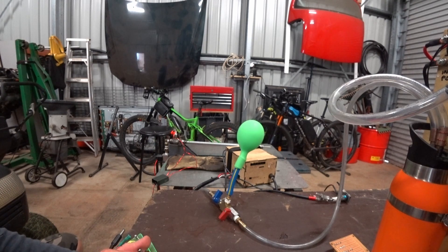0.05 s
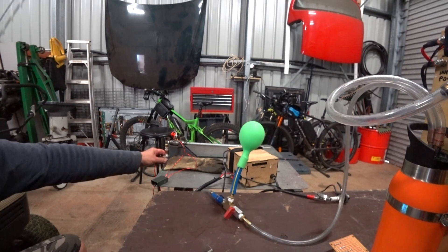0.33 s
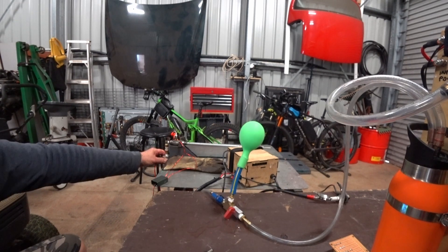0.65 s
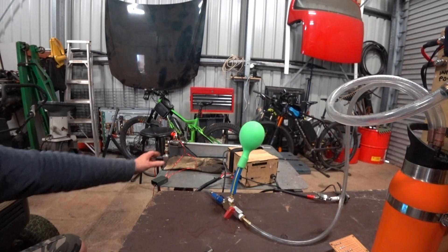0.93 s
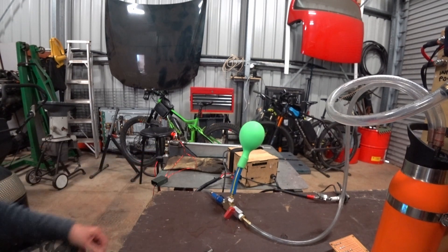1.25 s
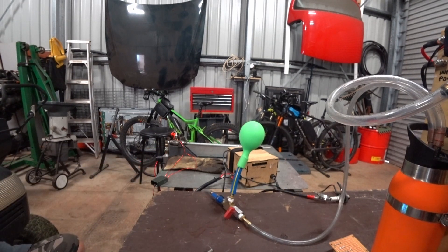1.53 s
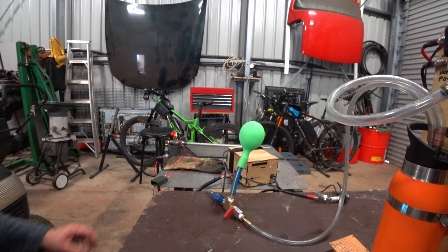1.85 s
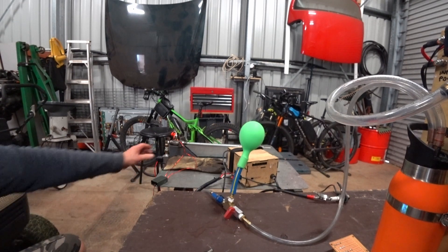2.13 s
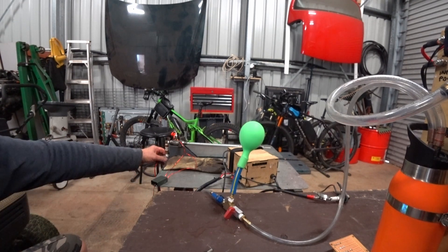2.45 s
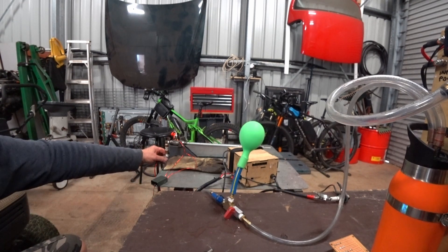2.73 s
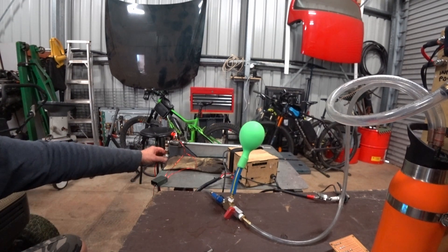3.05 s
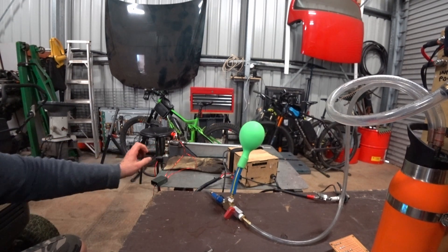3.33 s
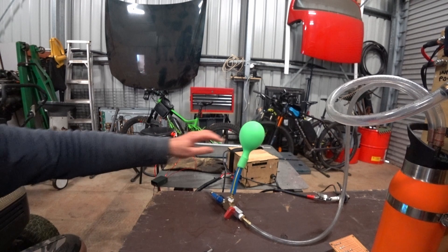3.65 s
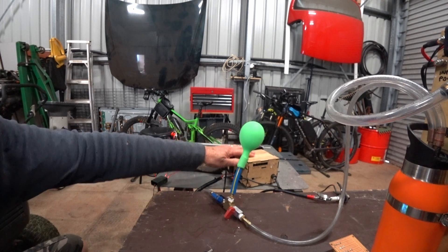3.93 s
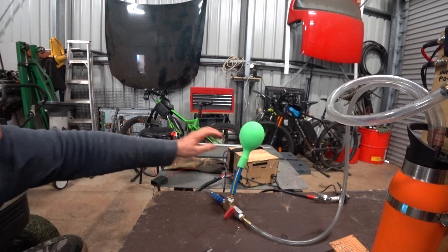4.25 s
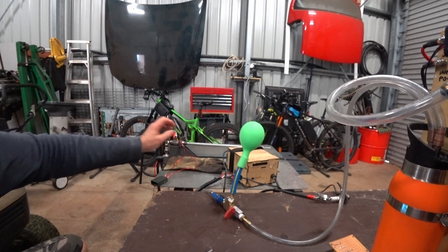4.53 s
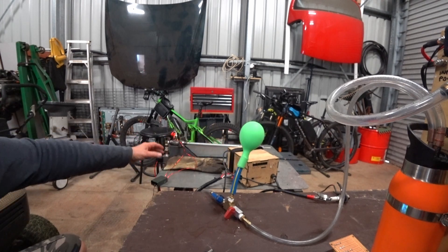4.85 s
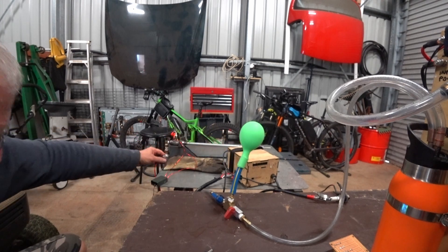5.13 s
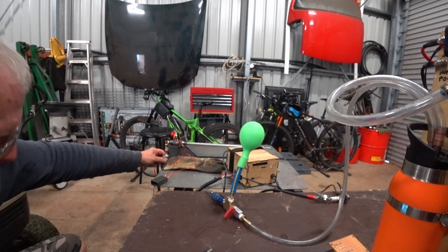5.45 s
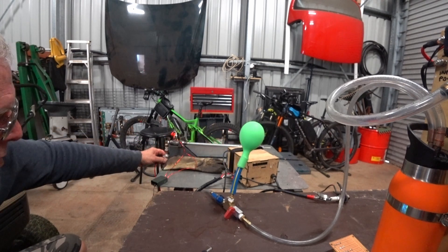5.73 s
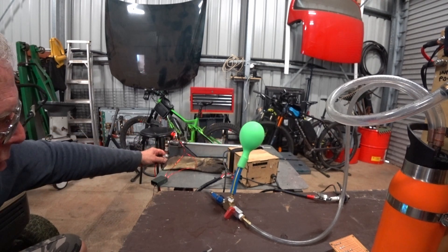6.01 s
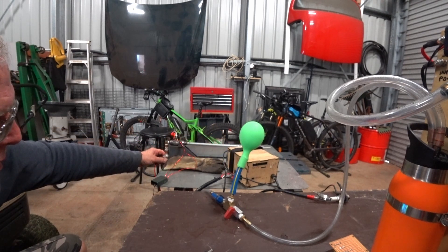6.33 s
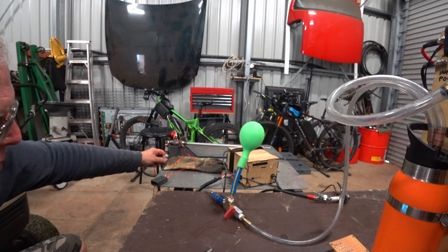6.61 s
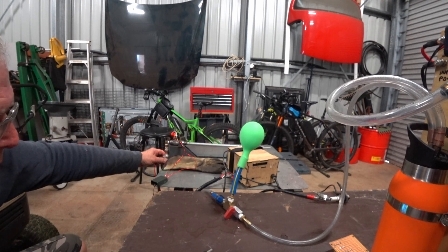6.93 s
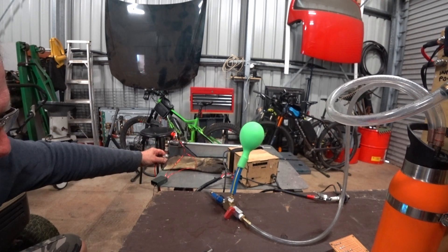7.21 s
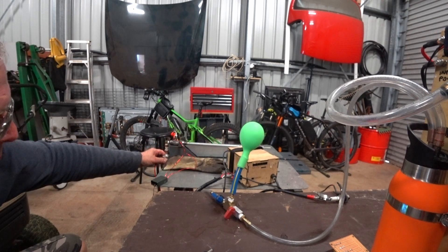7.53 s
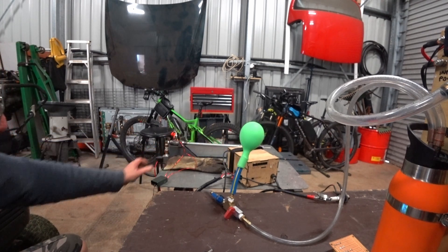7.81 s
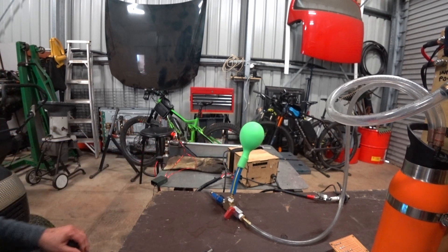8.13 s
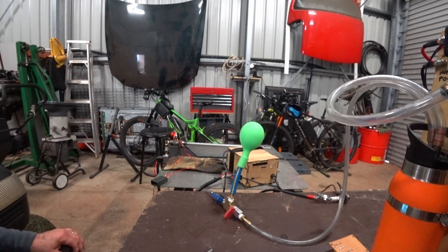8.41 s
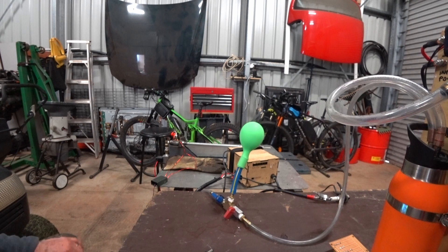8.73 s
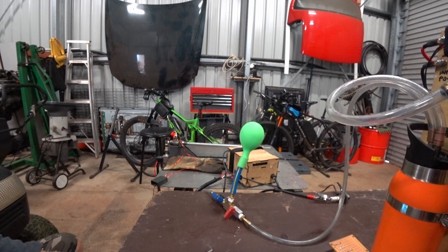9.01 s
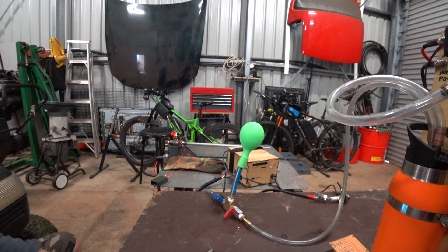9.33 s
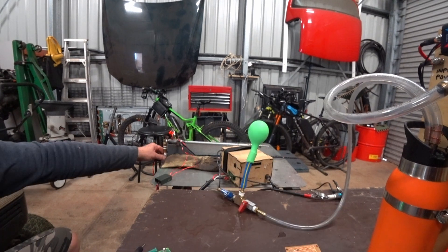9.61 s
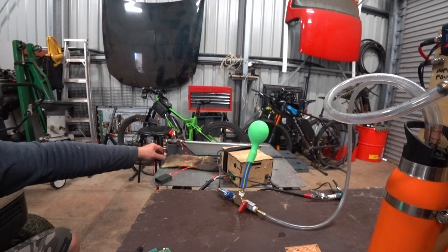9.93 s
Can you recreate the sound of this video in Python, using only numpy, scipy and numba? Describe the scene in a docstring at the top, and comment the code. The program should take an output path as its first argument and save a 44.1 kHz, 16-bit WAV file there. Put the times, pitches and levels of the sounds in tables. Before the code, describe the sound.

A thin, faint gas squeal rises, then a huge bang from a homemade engine tube fills a sheet-metal shed and leaves high tones ringing. A valve gives a short puff, and the rig makes a sharp clunk, metal clicks and dull knocks over a faint hiss. A second huge bang follows, then a knock, a sleeve rustle and a soft scuff. The microphone squashes both blasts, holding their echo level before it fades.

```python
"""Two huge gas detonations from a homemade engine tube in a sheet-metal shed.
Each shock fills the shed and leaves high tones lingering; the camera's limiter holds the reverberation
at one level until it dies down. Between shots a valve puffs and the rig clunks, clicks and knocks.
Gas hisses thinly in the line and squeals before the first shot. Behind it: a scuff, a rustling
sleeve, a faint low drone and still air with a thin whine."""
import sys
import numpy as np
from scipy import signal
from scipy.fft import rfft, irfft
from scipy.io import wavfile
from scipy.ndimage import uniform_filter1d
from numba import njit

SR = 44100
rng = np.random.default_rng(int(sys.argv[2]) if len(sys.argv) > 2 else 0)


def log_audio(samples):
    """Write samples as a 16-bit WAV file to the path given in sys.argv[1]."""
    # one column per channel
    frames = np.atleast_2d(samples).T
    # limit to full scale, then quantise
    limited = np.clip(frames, -1, 1)
    pcm = np.round(limited * 32767).astype(np.int16)
    wavfile.write(sys.argv[1], SR, pcm)


N = 439677
TIME = np.arange(N) / SR
TAIL = TIME[:2 * SR]  # time axis of one event


# shots: t/s, reverb level/dB, blast re reverb/dB, blast length/s, treble shelf/dB,
# ripple spacing/Hz, ripple depth/dB, punch/dB
DETONATIONS = [(1.2253, 45.5, -5, 0.0034, -0.5, 1453, 4, -14),
               (8.176, 46, -4.5, 0.0032, -3.5, 2336, 2, -8.5)]
FIRST_BANG_S = DETONATIONS[0][0]
# shock spectrum: f/Hz, level/dB
SHOCK_SPECTRUM = [(40, -47), (110, -43.5), (200, -29), (400, -22), (560, -18), (750, -12), (1100, -2.5),
                  (1400, -0.5), (1620, -5), (1860, -12), (2350, -1), (3050, -6), (3550, 0.5), (4350, -3.5),
                  (5000, -9), (7300, -7.5), (8300, -11.5), (12000, -13.5), (15000, -25.5)]

def detonations(room, shelf_hz=7500, ripple_from_hz=4800, punch_hz=450, bark_hz=2450, bark_db=4,
                ring_db=-19.5):
    """A shock leaves the tube and fills the shed; each shot has its own treble level."""
    out, ring = np.zeros((2, N)), room_ring()
    for t_s, db, blast_db, blast_s, treble_db, spacing_hz, ripple_db, punch_db in DETONATIONS:
        def shock_gain(hz):
            # a second front close behind the first combs the treble
            comb_db = ripple_db * np.cos(2 * np.pi * hz / spacing_hz) * above(hz, ripple_from_hz) ** 2
            return undb(across(SHOCK_SPECTRUM, hz) + treble_db * above(hz, shelf_hz) + comb_db)

        def mouth_gain(hz):
            punch = undb(punch_db) * hump(hz, punch_hz, punch_hz / 2) ** 2
            bark = undb(bark_db) * hump(hz, bark_hz, bark_hz / 10)
            return shock_gain(hz) + punch + bark
        burst = noise(len(TAIL), side_db=-14) / (1 + (TAIL / blast_s) ** 10)
        blast = unit(colour(burst, mouth_gain))
        reverb = unit(colour(room, shock_gain))
        add(out, t_s, db, undb(blast_db) * blast + reverb + undb(ring_db) * ring)
    return out


# room modes: f/Hz, level/dB
ROOM_MODES = [(2331, -37.5), (2466, -48), (2546, -42.5), (2799, -34.5), (3521, -47.5), (3607, -38),
              (3849, -42), (4301, -36), (4646, -53.5)]

def room_ring(t60_s=0.87):
    """High tones linger in the reverberation after each bang."""
    modes = 0
    for hz, db in ROOM_MODES:
        phase = rng.uniform(0, 2 * np.pi) + .5 * rng.standard_normal((2, 1))
        modes = modes + undb(db) * np.sin(2 * np.pi * hz * TAIL + phase)
    return unit(modes * fade(t60_s) * (1 - fade(.15)))


# hits of the clunk: t/s, level/dB, t60/s, room/dB
CLUNK_HITS = [(3.8933, -5, 0.055, -9), (3.8991, 12.5, 0.014, -4.5), (3.9096, 6, 0.054, -12.5)]
# clunk spectrum: f/Hz, level/dB
CLUNK_SPECTRUM = [(40, -57), (100, -24), (220, -15.5), (400, -1.5), (500, -1.5), (690, 4.5), (830, -7),
                  (1050, 0), (1450, -0.5), (1800, -3), (2600, -7), (3700, -7.5), (4800, -4.5),
                  (6500, -13.5), (7600, -11), (9000, -23), (11500, -19.5), (16000, -38)]

def rig_clunk(room, thump_hz=70, thump_width_hz=45, thump_db=-28):
    """A sharp clunk in three quick hits, with a low thump."""
    out = np.zeros((2, N))
    for t_s, db, t60_s, room_db in CLUNK_HITS:
        hit = crack(t60_s, side_db=-15) + undb(room_db) * room
        add(out, t_s, db, colour(hit, lambda hz: undb(across(CLUNK_SPECTRUM, hz))))
    thump = colour(crack(t60_s=.015), lambda hz: hump(hz, thump_hz, thump_width_hz))
    add(out, CLUNK_HITS[0][0], thump_db, thump)
    return out


# jet spectrum: f/Hz, level/dB
JET_SPECTRUM = [(150, -48), (400, -41.5), (570, -20), (760, -34), (1120, -23), (1850, -39), (2300, -24),
                (3080, -20.5), (3430, -51), (3900, -25), (4600, -19), (5400, -13), (9000, -12),
                (12400, -15), (14000, -12), (15500, -41)]
# nozzle cavities: f/Hz, half-width/Hz, level/dB
NOZZLE_MODES = [(2290, 150, -11), (4010, 68, -20), (5570, 110, -1), (5870, 65, -2), (6370, 56, -7),
                (6940, 85, -7), (7430, 72, -4), (7920, 88, 0), (8310, 62, -3), (9310, 99, -4),
                (9790, 68, -2), (11300, 150, -6), (11600, 58, -13), (13100, 69, -7)]
# narrow rings of the hollow valve: f/Hz, half-width/Hz, level/dB
VALVE_MODES = [(1126, 34, -16), (1614, 60, -18), (2216, 28, -17), (3020, 30, -15.5), (5140, 56, -2.5),
               (5600, 11, 3), (6370, 37, -8), (7500, 55, -10), (7800, 10, 3), (8330, 55, 1.5),
               (8900, 5.3, 9), (9788, 8.8, 6), (14000, 90, -14.5)]

def valve_puff(room, start_s=2.803, end_s=2.947, open_s=0.0034, shut_s=0.023, jet_db=-22.5,
               nozzle_db=3, broaden=1.7, room_db=-3):
    """A valve snaps open and shuts; the jet's noise rings nozzle and valve."""
    def gain(hz):
        cavities = sum(undb(db + nozzle_db) * hump(hz, mode_hz, broaden * width_hz) ** 2
                       for mode_hz, width_hz, db in NOZZLE_MODES)
        rings = sum(undb(db) * hump(hz, mode_hz, width_hz) for mode_hz, width_hz, db in VALVE_MODES)
        return undb(across(JET_SPECTRUM, hz)) + cavities + rings
    jet = level(colour(noise(N, side_db=-13), gain), jet_db) * envelope(start_s, end_s, open_s, shut_s)
    reverb = signal.fftconvolve(jet.mean(0)[None], room, axes=1)[:, :N]
    return jet + undb(room_db) * reverb


# metal clicks: t/s, level/dB, t60/s, room/dB, bright band/Hz
METAL_CLICKS = [(3.9228, -11, .006, -12, 8000), (3.9430, -4.5, 0.037, -4, 11300),
                (6.952, -0.5, 0.036, -4.5, 10900), (6.9664, -4.5, 0.0052, -15, 6200),
                (9.954, -27.5, .015, -9, 5000)]
# click spectrum: f/Hz, level/dB
CLICK_SPECTRUM = [(100, -48.5), (400, -4.5), (1000, -22), (1600, -3), (2300, -15), (3400, -6),
                  (4500, -11.5), (7300, -8.5), (8700, -18), (9800, -9), (12200, -10.5), (12800, -16),
                  (15500, -22)]

def clicks(room, lift_db=8, width_hz=1800):
    """Metal snaps on metal, each time with its own bright band."""
    out = np.zeros((2, N))
    for t_s, db, t60_s, room_db, bright_hz in METAL_CLICKS:
        gain = lambda hz: undb(across(CLICK_SPECTRUM, hz) + lift_db * hump(hz, bright_hz, width_hz))
        snap = crack(t60_s, side_db=-13) + undb(room_db) * room
        add(out, t_s, db, colour(snap, gain))
    return out


# dull knocks: t/s, level/dB, t60/s, room/dB, cutoff/Hz, ring/dB
RIG_KNOCKS = [(3.499, -23, 0.042, -3, 2600, -20), (4.489, -21.5, .04, -3.5, 2600, -16),
              (4.946, -29, .02, 2, 2550, 7), (4.975, -24.5, 0.022, 11, 2500, -4),
              (5.7759, -15, 0.03, -16.5, 2100, -28), (6.953, -22, .016, -9.5, 700, 0),
              (7.0211, -10.5, 0.014, -12, 1500, 3), (9.382, -16.5, 0.057, 0.5, 600, -40)]
# knock spectrum: f/Hz, level/dB
KNOCK_SPECTRUM = [(60, -44), (140, -14), (240, 2), (380, -2), (490, 3.5), (650, 7.5), (1000, 3),
                  (1600, 1.5), (5000, 0)]
# metal modes of the rig: f/Hz, level/dB, t60/s
METAL_MODES = [(397, -1.5, 0.095), (513, -9, 0.079), (620, 1, 0.097), (1560, -10, .14), (1590, 3, 0.12),
               (2052, 6, 0.078)]

def knocks(room):
    """Soft contacts lose their treble; some set the rig ringing."""
    out = np.zeros((2, N))
    modes = sum(undb(db) * np.sin(2 * np.pi * hz * TAIL) * fade(t60_s) for hz, db, t60_s in METAL_MODES)
    ring = unit(modes * (1 - fade(0.0073)))
    for t_s, db, t60_s, room_db, cutoff_hz, ring_db in RIG_KNOCKS:
        gain = lambda hz: undb(across(KNOCK_SPECTRUM, hz)) * (1 - above(hz, cutoff_hz))
        contact = crack(t60_s, side_db=-12) + undb(room_db) * room
        thud = unit(colour(contact, gain))
        add(out, t_s, db, thud + undb(ring_db) * ring)
    return out


# gas flow: start/s, end/s, level/dB, rise/s, hold/s, sag/(dB/s)
GAS_FLOWS = [(-.25, FIRST_BANG_S, -56, .6, .05, 5.5), (2.3, 9.56, -54.5, 1.2, 3.4, 1.5),
             (9.56, 10, -64, .02, .4, 1)]

def gas_line(ref_db=-58, base_hz=7430, climb_hz_per_db=42, half_width_hz=530, shut_s=.15,
             shoulder_hz=8550, shoulder_width_hz=430, shoulder_db=-17, shoulder_power=4.2):
    """Gas hisses through a narrow opening; more flow lifts the band and adds an upper shoulder."""
    flow = sum(undb(db) * envelope(start_s, end_s, rise_s, shut_s, hold_s, sag_db_per_s)
               for start_s, end_s, db, rise_s, hold_s, sag_db_per_s in GAS_FLOWS)
    strength = flow / undb(ref_db)
    centre_hz = base_hz + climb_hz_per_db * 20 * np.log10(np.maximum(strength, 1))
    shoulder = narrow_hiss(np.full(N, shoulder_hz), shoulder_width_hz) * strength ** shoulder_power
    return narrow_hiss(centre_hz, half_width_hz) * flow + undb(ref_db + shoulder_db) * shoulder


def squeal(start_s=.93, rise_s=.12, release_s=.06, fundamental_db=-69.5, octave_db=2,
           final_hz=3185, climb_hz=401, settle_s=.07, width_hz=35):
    """Gas whistles thinly until the first shot; the pitch climbs and levels off."""
    age_s = np.maximum(TIME - start_s, 0)
    pitch_hz = final_hz - climb_hz * np.exp(-age_s / settle_s)
    whistle = narrow_hiss(pitch_hz, width_hz) + undb(octave_db) * narrow_hiss(2 * pitch_hz, 2 * width_hz)
    return undb(fundamental_db) * whistle * envelope(start_s, FIRST_BANG_S, rise_s, release_s)


def scuff(room, start_s=9.565, db=-18, centre_hz=1020, width_hz=200):
    """One soft, hollow scuff."""
    out = np.zeros((2, N))
    rub = crack(t60_s=0.11) * (1 - fade(.06)) + undb(-1) * room
    add(out, start_s, db, colour(rub, lambda hz: hump(hz, centre_hz, width_hz)))
    return out


# sleeve rustles: start/s, end/s, level/dB
SLEEVE_MOVES = [(8.09, 8.18, -59.5), (9.36, 9.55, -55.5), (9.62, 9.92, -67)]

def sleeve(centre_hz=2300, width_hz=1900, patchy_db=3, catch_samples=256):
    """Cloth rubs in uneven little catches."""
    steps = np.repeat(rng.standard_normal(N // catch_samples + 1), catch_samples)[:N]
    catches = uniform_filter1d(steps, catch_samples)
    rub = colour(noise(N, side_db=-6), lambda hz: hump(hz, centre_hz, width_hz))
    moves = sum(undb(db) * envelope(start_s, end_s, rise_s=.03, release_s=.25, sag_db_per_s=22)
                for start_s, end_s, db in SLEEVE_MOVES)
    return level(rub * undb(patchy_db * catches), 0) * moves


def drone(centre_hz=238, width_hz=35, db=-68.5):
    """A narrow low drone swells once and sinks away."""
    hum = level(colour(noise(N, side_db=-13), lambda hz: hump(hz, centre_hz, width_hz)), db)
    return hum * envelope(start_s=3.45, end_s=9.56, rise_s=3, release_s=.8, sag_db_per_s=1)


# room tone: f/Hz, level/dB
AIR_SPECTRUM = [(30, -31.5), (70, -13), (150, -5), (220, -3.5), (420, -3.5), (720, 1.5), (1400, -2.5),
                (2200, -8), (3400, -9), (5200, -15), (10500, -10.5), (14000, -12.5), (16000, -22.5)]

def still_air(air_db=-56, wide_from_hz=450, whine_hz=10703, whine_db=-76):
    """Air in the shed, alike in both ears in the bass, with a thin whine."""
    mid, side = colour(rng.standard_normal((2, N)), lambda hz: undb(across(AIR_SPECTRUM, hz)))
    side = signal.sosfilt(signal.butter(1, wide_from_hz, "high", fs=SR, output="sos"), side)
    air = level(mid + undb(1) * np.array([side, -side]), air_db)
    return air + level(np.sin(2 * np.pi * whine_hz * TIME), whine_db)


# reverb decay: f/Hz, t60/s
REVERB_T60 = [(100, .9), (330, 0.91), (600, 0.66), (1200, 0.69), (2600, 0.91), (4000, 0.85), (6500, 0.62),
              (10000, .52), (15000, .42)]
# reverb width: f/Hz, side re mid/dB
REVERB_WIDTH = [(100, -16), (380, -18.5), (800, -12.5), (2400, -6.5), (4400, -10), (9000, -5)]

def shed(build_s=0.0093, clutter_db=-15):
    """Room response: weak scatter from nearby clutter, then dense echoes from the steel walls."""
    hz = np.fft.rfftfreq(len(TAIL), 1 / SR)
    mid, side = rfft(rng.standard_normal((2, len(TAIL))))
    side = side * undb(across(REVERB_WIDTH, hz))
    field = np.array([mid + side, mid - side])
    centres_hz, t60s = np.transpose(REVERB_T60)
    echoes = 0
    for share, t60_s in zip(np.eye(len(centres_hz)), t60s):
        band = irfft(field * across(np.c_[centres_hz, share], hz))
        echoes = echoes + band * fade(t60_s)
    build_up = 1 - np.exp(-(TAIL / build_s) ** 2)
    return unit(echoes * (undb(clutter_db) + build_up))


def crack(t60_s, side_db=-11):
    """Direct sound of a blow: a fast-dying noise burst."""
    return unit(noise(len(TAIL), side_db) * fade(t60_s))


def narrow_hiss(centre_hz, half_width_hz):
    """Unit-rms noise band whose centre can move."""
    lowpass = signal.butter(2, half_width_hz, fs=SR, output="sos")
    eddies = signal.sosfilt(lowpass, noise(N, side_db=-1.8) + 1j * noise(N, side_db=-1.3))
    carrier = np.exp(2j * np.pi * np.cumsum(centre_hz) / SR)
    return level(np.real(eddies * carrier), 0)


def noise(count, side_db):
    """White stereo noise of a given width."""
    mid, side = rng.standard_normal((2, count))
    return mid + undb(side_db) * np.array([side, -side])


def envelope(start_s, end_s, rise_s, release_s, hold_s=0, sag_db_per_s=0):
    """Smooth rise, hold, sag; after end_s, 60 dB down per release_s."""
    age_s = TIME - start_s
    rise = np.sin(np.pi / 2 * np.clip(age_s / rise_s, 0, 1)) ** 2
    sag = undb(-sag_db_per_s * np.maximum(age_s - rise_s - hold_s, 0))
    release = np.exp(-np.log(1000) * np.maximum(TIME - end_s, 0) / release_s)
    return rise * sag * release


def fade(t60_s):
    """Exponential decay."""
    return np.exp(-np.log(1000) * TAIL / t60_s)


def colour(x, gain_at, size=4096):
    """Minimum-phase filter with gain gain_at(hz)."""
    cepstrum = irfft(np.log(gain_at(np.fft.rfftfreq(size, 1 / SR)) + 1e-9))
    cepstrum[1:size // 2] *= 2
    cepstrum[size // 2 + 1:] = 0
    impulse = irfft(np.exp(rfft(cepstrum)))
    return signal.fftconvolve(x, impulse[None], axes=1)[:, :x.shape[1]]


def across(points, hz):
    """Interpolate (f/Hz, value) points over log frequency."""
    points_hz, values = np.transpose(points)
    return np.interp(np.log(np.maximum(hz, 1)), np.log(points_hz), values)


def hump(hz, centre_hz, width_hz):
    """Resonance gain, halved at width_hz off centre."""
    return 1 / (1 + ((hz - centre_hz) / width_hz) ** 2)


def above(hz, edge_hz):
    """Smooth step from 0 to 1 around edge_hz."""
    return hz ** 4 / (hz ** 4 + edge_hz ** 4)


def undb(db):
    """Decibels to gain."""
    return 10 ** (np.asarray(db) / 20)


def unit(x):
    """Scale to a mean channel energy of one."""
    return x / np.sqrt(np.mean(np.sum(x ** 2, axis=-1)))


def level(x, db):
    """Scale to an rms level."""
    return x * undb(db) / np.sqrt(np.mean(x ** 2))


def add(out, t_s, energy_db, sound):
    """Mix in one event."""
    start = int(t_s * SR)
    out[:, start:start + len(TAIL)] += undb(energy_db) * unit(sound)[:, :N - start]


def scene():
    """All sources in one shed."""
    room = shed()
    shots = detonations(room)
    handling = rig_clunk(room) + clicks(room) + knocks(room) + scuff(room) + sleeve()
    gas = valve_puff(room) + gas_line() + squeal()
    return shots + handling + gas + drone() + still_air()


@njit
def follow_peaks(x, decay_per_sample):
    """Envelope with instant attack and slow release."""
    out, held = np.empty(len(x)), 0.
    for i in range(len(x)):
        held = max(x[i], held * decay_per_sample)
        out[i] = held
    return out


def limiter(x, limit_db=-14.5, release_s=0.038, window_s=0.00542, knee=4.1):
    """Turns the gain down just ahead of loud sound, with a soft knee."""
    power = uniform_filter1d(np.mean(x ** 2, axis=0), int(window_s * SR))
    rms = np.sqrt(np.abs(power))
    over = follow_peaks(rms, np.exp(-1 / (release_s * SR))) / undb(limit_db)
    return x / (1 + over ** knee) ** (1 / knee)


# microphone balance: f/Hz, left minus right/dB
MIC_BALANCE = [(100, -1), (350, -2.5), (1200, -1), (2400, 0.5), (6000, 2.5), (15000, 0.5)]

def record(dry, cutoff_hz=15900):
    """The camera colours its two channels slightly differently, limits, and cuts the top."""
    left = colour(dry[:1], lambda hz: undb(across(MIC_BALANCE, hz) / 2))
    right = colour(dry[1:], lambda hz: undb(-across(MIC_BALANCE, hz) / 2))
    limited = limiter(np.vstack([left, right]))
    return signal.sosfilt(signal.ellip(10, .2, 80, cutoff_hz, fs=SR, output="sos"), limited)


dry = scene()
out = record(dry)
log_audio(out)
```